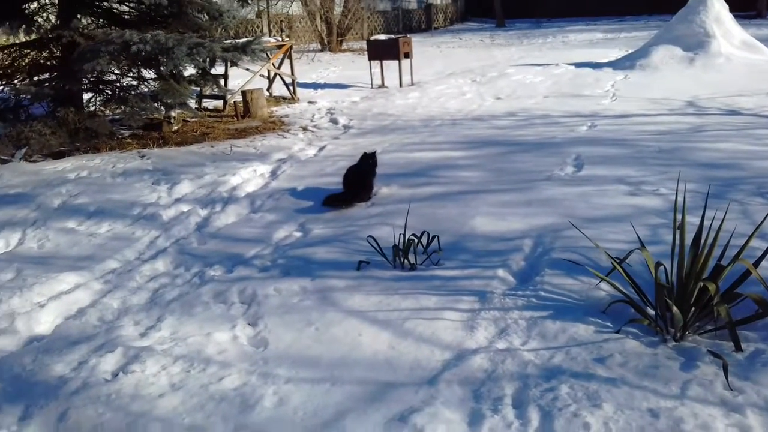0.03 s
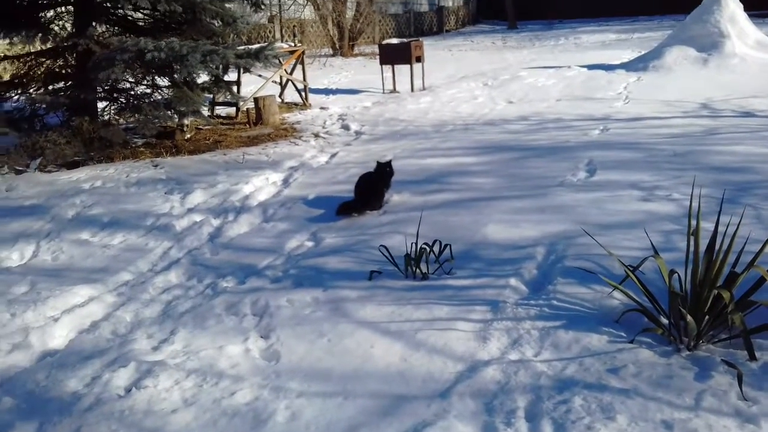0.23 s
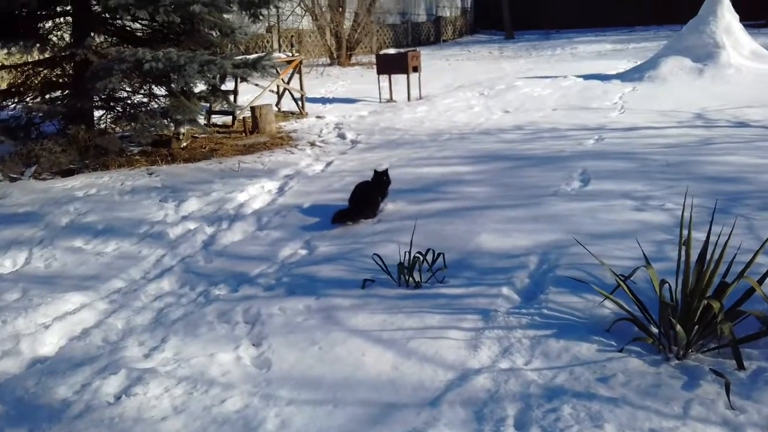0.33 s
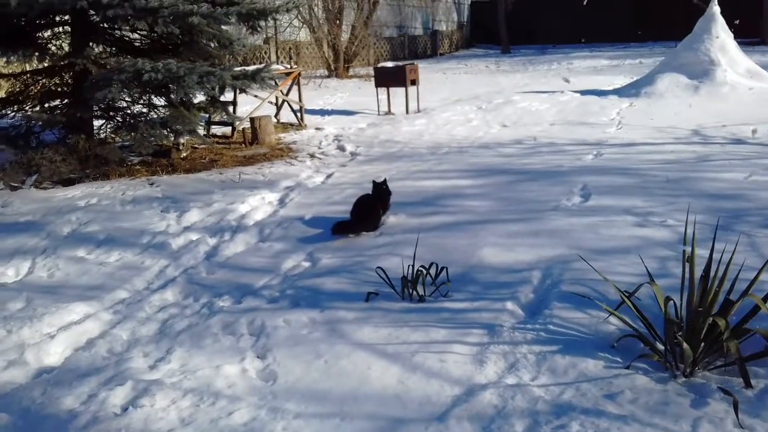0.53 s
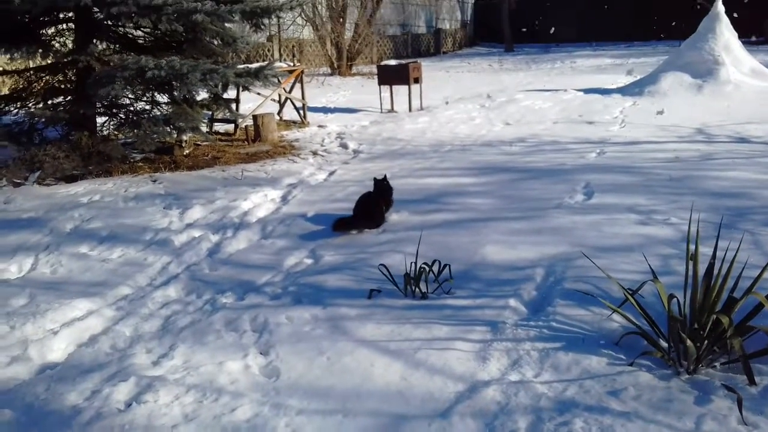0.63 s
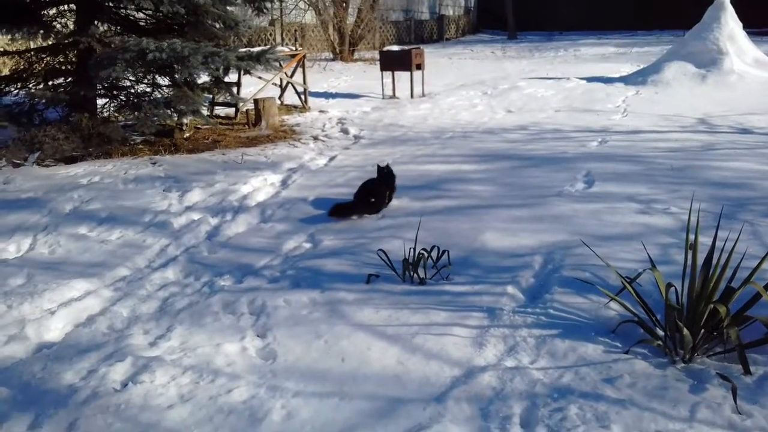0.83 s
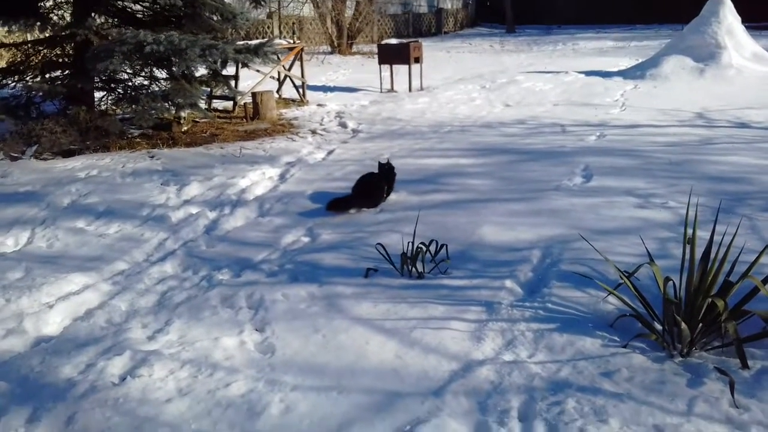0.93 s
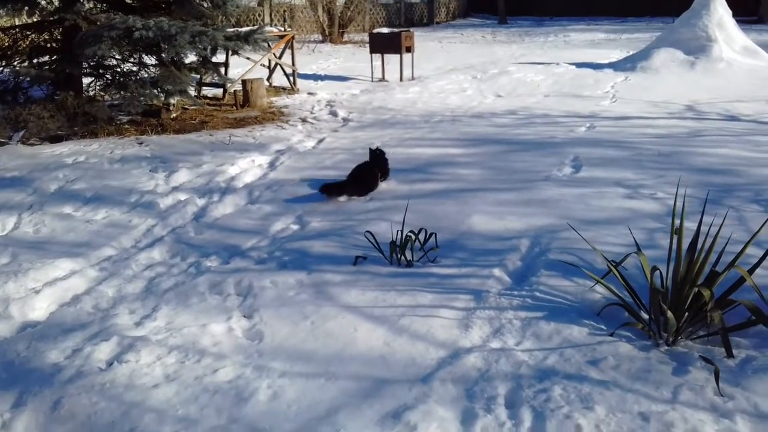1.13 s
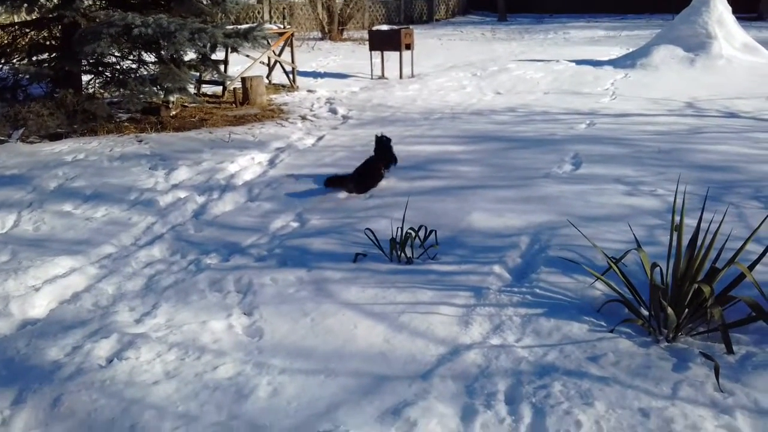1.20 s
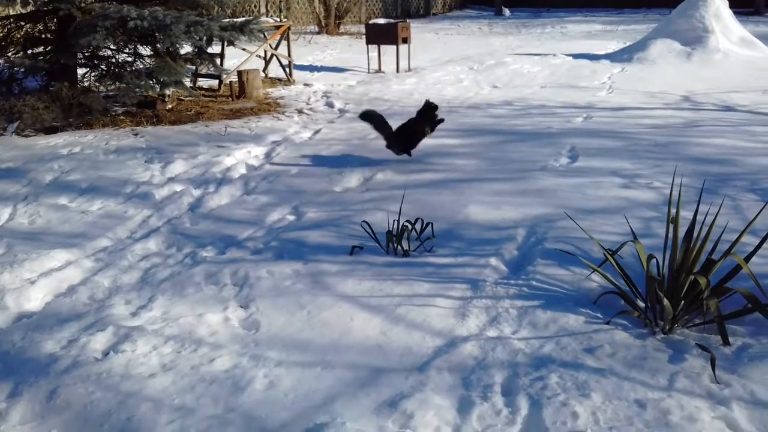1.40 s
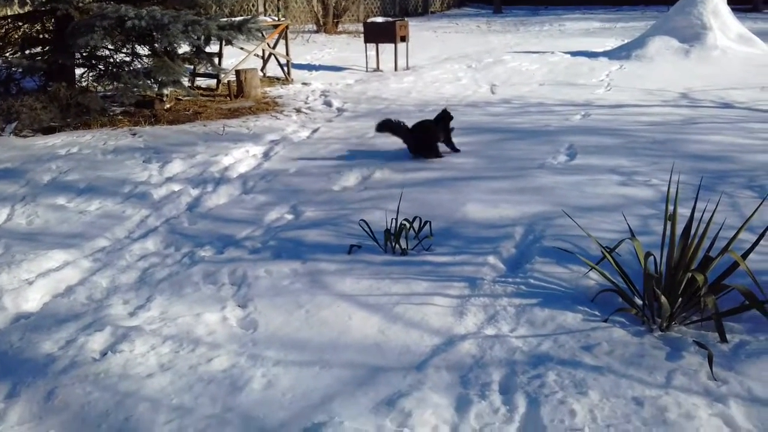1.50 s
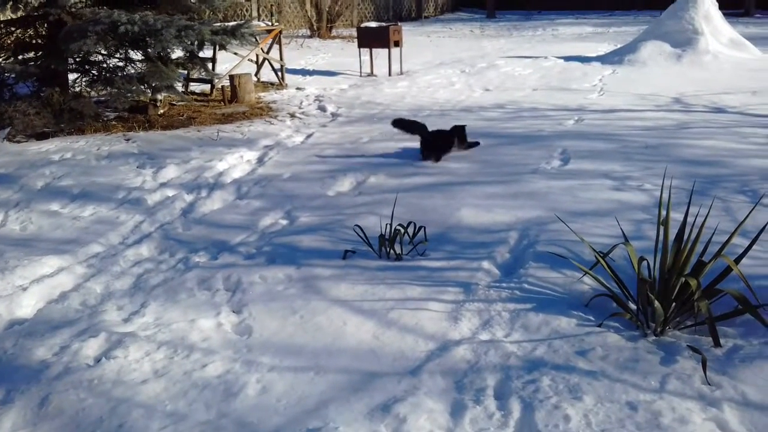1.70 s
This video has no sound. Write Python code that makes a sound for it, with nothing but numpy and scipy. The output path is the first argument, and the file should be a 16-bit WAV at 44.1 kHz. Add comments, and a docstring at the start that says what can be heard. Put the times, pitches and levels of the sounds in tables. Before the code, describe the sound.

Snow crunches twice close to the microphone, at about 0.25 and 0.35 seconds, crisp icy grains over a duller crush. A softer slide follows from 0.5 to 0.9 seconds as it packs down, then small shifts and ticks come around 1.4 to 1.6 seconds. Small birds chirp faintly across the yard until about 1.4 seconds, and distant traffic hums low throughout.

```python
"""A winter yard: distant traffic hums throughout, and small birds chirp far off from the start.
A quarter of a second in, snow is pressed close to the microphone and gives two quick crunches.
Each press breaks a swarm of ice grains over a duller crush of the packed snow beneath.
A softer slide follows as the snow packs down, while one far engine slowly gains speed.
The birds fall silent, and the snow ends with small shifts and ticks."""
import sys
import numpy as np
from scipy import signal
from scipy.fft import rfft, irfft, next_fast_len
from scipy.io import wavfile
from scipy.ndimage import map_coordinates

SR = 44100
rng = np.random.default_rng(int(sys.argv[2]) if len(sys.argv) > 2 else 0)


def generate_wav(sig):
    """Save sig (samples, or channels by samples) to the path in sys.argv[1] as 16-bit PCM at SR."""
    pcm = np.round(np.clip(np.atleast_2d(sig).T, -1, 1) * 32767).astype(np.int16)
    wavfile.write(sys.argv[1], SR, pcm)


N = 77175

# tone of the hiss that both microphones share: f/Hz, level/dB
HISS_TONE = [(2000, -42.5), (5500, -19.5), (8000, -17), (9800, -5), (11500, -16.5), (15500, -24.5)]
# tone of the noise that differs between the two microphones: f/Hz, level/dB
MIC_TONE = [(30, -9.5), (120, -3.5), (300, -5), (600, -5), (1000, -14.5), (1500, -26), (2200, -10),
            (4000, -18.5), (9000, -23), (15500, -17.5)]
# tone of the distant traffic: f/Hz, level/dB
TRAFFIC_TONE = [(20, -27), (45, -10), (100, -6.5), (140, -8.5), (200, -1.5), (330, -0.5), (460, -0.5),
                (750, 0.5), (1150, 0.5), (1650, 0), (1900, -5), (3000, -7.5), (5000, -16), (15000, -22)]
# narrow bands of whine in the traffic: f/Hz, width/Hz, level/dB
WHINE_BANDS = [(346.3, 23, -83.5), (1125, 150, -74), (1582, 45, -75)]
# how the traffic swells and sinks: t/s, level/dB
TRAFFIC_SWELL = [(0, -62.5), (.25, -61), (.6, -61.5), (.95, -63), (1.2, -65.5), (1.55, -64), (1.66, -63),
                 (1.75, -64)]
# the far engine's firing note: t/s, f/Hz, level/dB
ENGINE_NOTE = [(0, 50, -100), (.22, 50, -96), (.3, 50, -85), (.55, 51, -86), (.68, 53, -77), (1, 56, -81),
               (1.12, 57, -75), (1.38, 60, -74), (1.52, 61, -80), (1.75, 64, -78)]
# bird notes: t/s, length/s, start f/Hz, middle f/Hz, end f/Hz, level/dB
BIRD_NOTES = [(.02, 0.03, 4120, 4200, 4380, -63.5), (0.03, 0.01, 5040, 5300, 4960, -60),
              (0.042, 0.026, 4080, 3330, 4350, -58), (0.15, 0.037, 5900, 5540, 5100, -60.5),
              (0.215, 0.03, 3580, 5560, 4400, -54.5), (0.269, .03, 3510, 3186, 2520, -52.5),
              (.431, 0.029, 4635, 3470, 2770, -51.5), (0.458, 0.019, 2600, 2770, 2970, -54),
              (0.689, 0.04, 3816, 4300, 3400, -55), (.732, .028, 5200, 4220, 3200, -57.5),
              (0.81, 0.013, 3990, 4600, 4300, -62.5), (0.831, 0.024, 3800, 3425, 3200, -64),
              (0.937, 0.0262, 5980, 5376, 5470, -58), (0.957, 0.017, 3540, 4000, 4760, -69),
              (0.973, 0.011, 5630, 5400, 5250, -70), (1.001, 0.019, 4990, 4330, 3260, -62),
              (1.022, 0.027, 3580, 3710, 4800, -64.5), (1.298, .013, 4830, 4300, 3430, -68.5),
              (1.336, 0.037, 3300, 4050, 4400, -68.5)]
# tone of the packed snow giving way: f/Hz, level/dB
THUD_TONE = [(30, -12), (100, -11.5), (280, 3), (600, 1.5), (1200, -13.5), (4000, -19)]
# single snaps of the snow's crust: t/s, peak level/dB
CRUST_SNAPS = [(.2785, -43), (0.313, -35), (.3563, -30), (.919, -44.5), (1.5512, -41), (1.554, -54),
               (1.5553, -54), (1.5851, -48), (1.5898, -46.5)]
# tone of one snap, heard through the microphone's ring near 10 kHz: f/Hz, level/dB
SNAP_TONE = [(300, -39), (2000, -26), (5000, -22), (7000, -8), (8500, -3), (9800, 3), (11000, -6),
             (12500, -18), (15500, -21)]
# presses on the snow: peak t/s, rise/s, fall/s, ice level/dB, packed snow level/dB
SNOW_PRESSES = [(.01, .04, 0.049, -65.5, -64), (.17, 0.11, 0.15, -63, -65.5),
                (.232, 0.0056, 0.033, -45, -68), (0.247, 0.013, 0.011, -42.5, -51.5),
                (0.266, 0.015, 0.031, -34.5, -55), (0.291, 0.019, 0.028, -51, -49.5),
                (.316, .008, .02, -48, -56), (.353, 0.032, 0.053, -37, -47),
                (.388, 0.022, 0.08, -60, -57.5), (0.531, 0.055, 0.098, -48, -57),
                (.665, 0.066, 0.089, -50, -57), (.708, .014, 0.0097, -50.5, -70),
                (0.824, 0.1, 0.089, -54.5, -61.5), (1.114, 0.014, 0.04, -61, -84),
                (1.33, .07, 0.11, -65.5, -69), (1.405, .02, 0.047, -56, -80),
                (1.585, 0.094, 0.033, -69.5, -90), (1.745, 0.022, .04, -67, -80)]
# bright tone of ice grains heard through the microphone's ring near 10 kHz: f/Hz, level/dB
ICE_AT_MIC_TONE = [(300, -43), (2000, -26), (4000, -16.5), (5600, -22), (7000, -13), (8400, -8),
                   (9800, 1.5), (11000, -6), (12500, -13), (15500, -17.5)]
# duller tone of the packed snow beneath: f/Hz, level/dB
PACK_TONE = [(40, -5), (120, -14), (300, -12), (800, 0), (1600, 3), (2600, -0.5), (4200, -4), (7000, 0),
             (14000, -28.5)]


def amp(db):
    """Turn decibels into a number to multiply by."""
    return 10 ** (np.asarray(db) / 20)


def unit(x):
    """Scale a sound to an average power of 1."""
    return x / np.sqrt(np.mean(x ** 2) + 1e-20)


def clock():
    """The time of each sample, in seconds."""
    return np.arange(N) / SR


def curves(rows):
    """Join a table's rows with straight lines: one curve for each column after the time."""
    times, *columns = np.transpose(rows)
    return [np.interp(clock(), times, column) for column in columns]


def filtered(x, response):
    """Turn each frequency up or down by response(hz)."""
    size = next_fast_len(N + SR // 2)
    hz = np.fft.rfftfreq(size, 1 / SR)
    return irfft(rfft(x, size) * response(hz), size)[..., :N]


def coloured(x, tone):
    """Give a sound the tone set out in a table of f/Hz, level/dB."""
    size = 2 * next_fast_len(N)
    hz = np.fft.rfftfreq(size, 1 / SR)
    tone_hz, tone_db = np.transpose(tone)
    gain = amp(np.interp(np.log(hz + 1), np.log(tone_hz + 1), tone_db))
    # these three steps make the filter ring only after a click, never before it
    cepstrum = irfft(np.log(gain), size)
    cepstrum[1:size // 2] *= 2
    cepstrum[size // 2 + 1:] = 0
    return irfft(rfft(x, size) * np.exp(rfft(cepstrum)), size)[:N]


def noise(tone):
    """Steady noise with the given tone and a power of 1."""
    return unit(coloured(rng.standard_normal(N), tone))


def wobble(per_s):
    """A smooth curve through per_s random values each second."""
    return map_coordinates(rng.standard_normal(int(N * per_s / SR) + 4), [clock() * per_s])


def decay(start_s, life_s):
    """Jump to 1 at start_s, then shrink to about a third every life_s."""
    age = clock() - start_s
    return (age >= 0) * np.exp(-np.abs(age / life_s))


def fractures(per_s, spread_db, powder_share):
    """Tiny breaks of uneven size, mixed with the even rush of powder."""
    sizes = amp(spread_db * np.minimum(rng.exponential(size=N), 5))
    breaking = rng.random(N) < per_s / SR
    breaks = breaking * sizes * np.sign(rng.standard_normal(N))
    powder = rng.standard_normal(N)
    return np.sqrt(1 - powder_share) * unit(breaks) + np.sqrt(powder_share) * powder


def microphone_noise():
    """The microphones' own faint noise: a thin shared hiss, and a part that differs between them."""
    return amp(-71.5) * noise(HISS_TONE), amp(-80.5) * noise(MIC_TONE)


def traffic():
    """Far traffic blends into a low wash, with a whine that swells and sinks along with it."""
    level_db, = curves(TRAFFIC_SWELL)
    whine = np.zeros(N)
    for hz, width, db in WHINE_BANDS:
        band = filtered(rng.standard_normal(N), lambda f: 1 / (1 + (2 * (f - hz) / width) ** 2))
        whine += amp(db) * unit(band)
    wash = amp(level_db + 0.75 * wobble(11.77)) * noise(TRAFFIC_TONE)
    return wash + amp(level_db - level_db.mean()) * whine


def engine(waver_db=0.6):
    """A far engine speeds up; only the low note of its firing carries to the yard."""
    hz, db = curves(ENGINE_NOTE)
    note = unit(np.sin(2 * np.pi * np.cumsum(hz) / SR))
    return amp(db + waver_db * wobble(14)) * note


def birds(pitch_waver=0.022, rough_db=2.5):
    """Small birds whistle short, slightly rough notes that slide in pitch."""
    t, song = clock(), np.zeros(N)
    waver = 1 + pitch_waver * wobble(500)
    for start, length, start_hz, middle_hz, end_hz, db in BIRD_NOTES:
        progress = np.clip((t - start) / length, 0, 1)
        arc = np.polyfit([0, .5, 1], [start_hz, middle_hz, end_hz], 2)
        hz = np.polyval(arc, progress) * waver
        song += amp(db) * np.sin(np.pi * progress) * np.sin(2 * np.pi * np.cumsum(hz) / SR)
    return song * amp(rough_db * wobble(400))


def yard_echo(song, wall_delay_s=0.007, wall_db=-9.5, trees_db=-2.5, fade_s=0.38):
    """The song arrives directly, bounces once off a wall and is scattered by trees."""
    t = clock()
    wall = np.interp(t - wall_delay_s, t, song)
    tail = rng.standard_normal(N) * amp(-60 * t / fade_s)
    trees = signal.fftconvolve(song, tail / np.linalg.norm(tail))[:N]
    return song + amp(wall_db) * wall + amp(trees_db) * trees


def pack_thud():
    """One soft thud as the packed snow gives way under the second crunch."""
    return amp(-48) * decay(start_s=0.3355, life_s=0.01) * noise(THUD_TONE)


def crust_snaps():
    """The crust breaks in single sharp snaps, each a tiny burst of noise."""
    snaps = np.zeros(N)
    for start, peak_db in CRUST_SNAPS:
        burst = decay(start, life_s=0.00018) * rng.standard_normal(N)
        snap = coloured(burst, SNAP_TONE)
        snaps += amp(peak_db) * snap / np.abs(snap).max()
    return snaps


def snow_presses(rise_bend=1.65, fall_bend=1.52, edge_db=8.5):
    """Each press swells and fades, breaking ice on top and crushing the packed snow beneath."""
    t, ice_power, pack_power = clock(), np.zeros(N), np.zeros(N)
    for peak, rise, fall, ice_db, pack_db in SNOW_PRESSES:
        # a press is edge_db quieter one rise time before its peak and one fall time after
        before = np.abs((t - peak) / rise) ** rise_bend
        after = np.abs((t - peak) / fall) ** fall_bend
        drop_db = edge_db * np.where(t < peak, before, after)
        ice_power += amp(ice_db - drop_db) ** 2
        pack_power += amp(pack_db - drop_db) ** 2
    grains = fractures(per_s=6000, spread_db=2, powder_share=0.27)
    crush = fractures(per_s=1800, spread_db=1.5, powder_share=0.43)
    ice = np.sqrt(ice_power) * unit(coloured(grains, ICE_AT_MIC_TONE))
    pack = np.sqrt(pack_power) * unit(coloured(crush, PACK_TONE))
    return ice + pack


def scene():
    """Every source sits in the centre; only the microphones' own noise spreads left and right."""
    snow = snow_presses() + pack_thud() + crust_snaps()
    background = yard_echo(birds()) + traffic() + engine()
    hiss, side = microphone_noise()
    centre = snow + background + hiss
    return np.array([centre + side, centre - side])


def record(dry, top_hz=15750):
    """Cut away the very highest treble, everything above top_hz."""
    return filtered(dry, lambda hz: hz < top_hz)


dry = scene()
out = record(dry)
generate_wav(out)
```